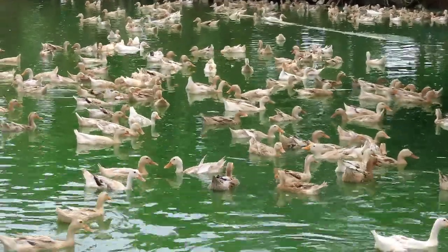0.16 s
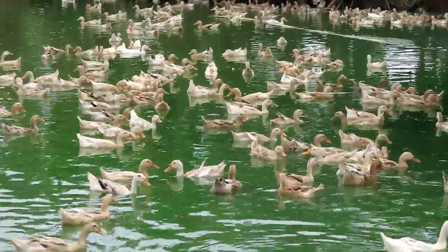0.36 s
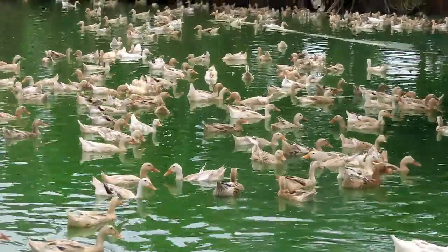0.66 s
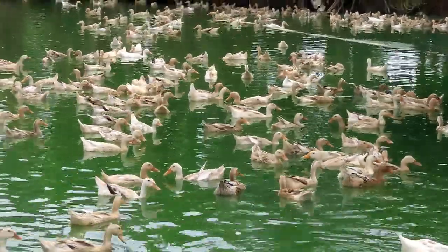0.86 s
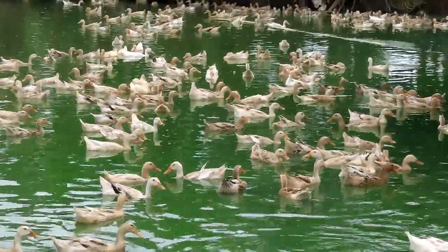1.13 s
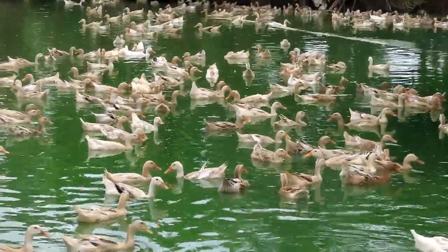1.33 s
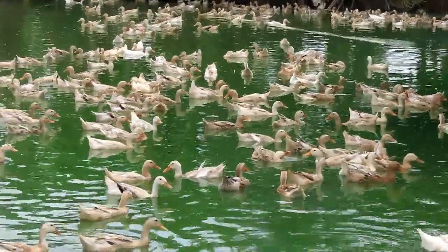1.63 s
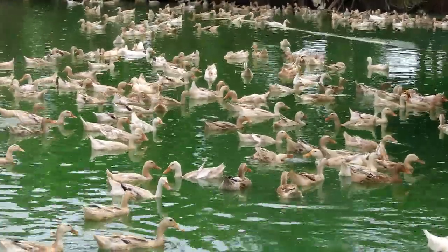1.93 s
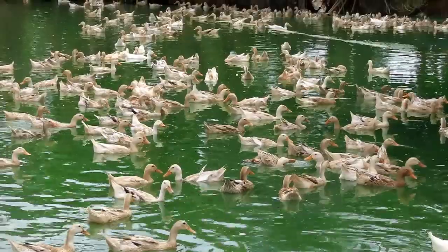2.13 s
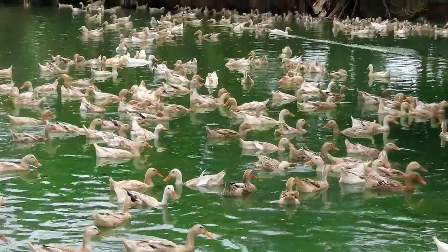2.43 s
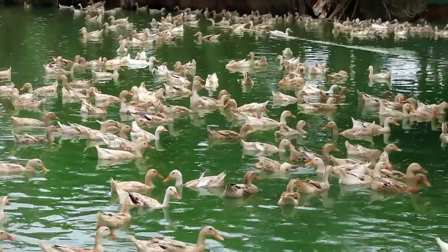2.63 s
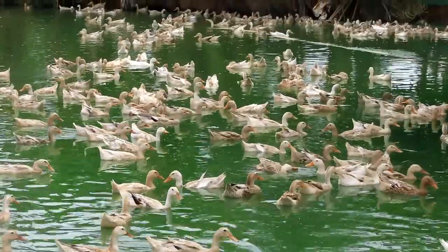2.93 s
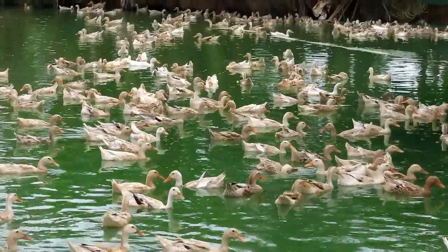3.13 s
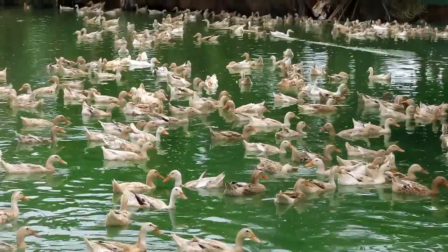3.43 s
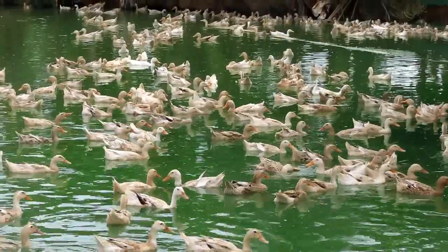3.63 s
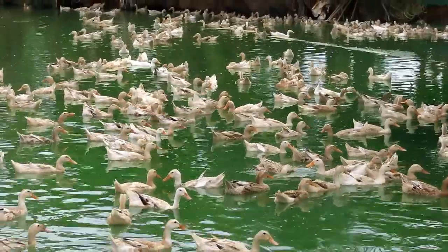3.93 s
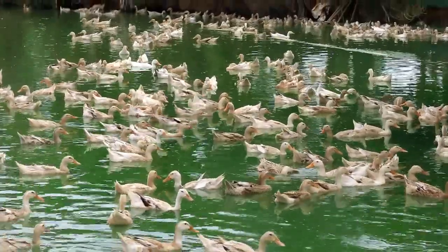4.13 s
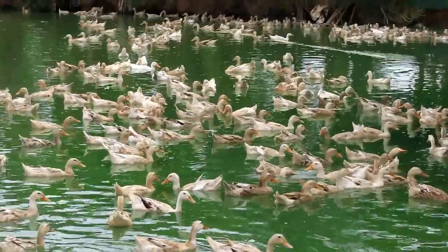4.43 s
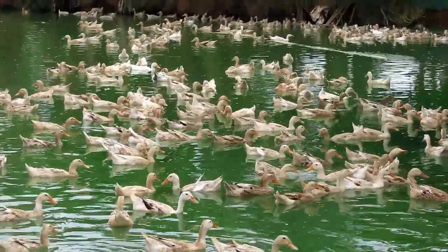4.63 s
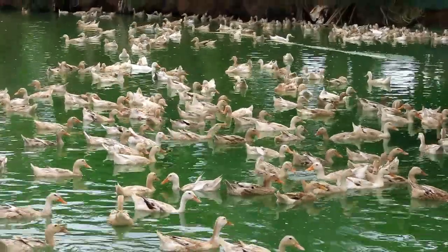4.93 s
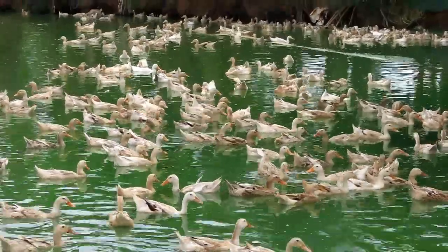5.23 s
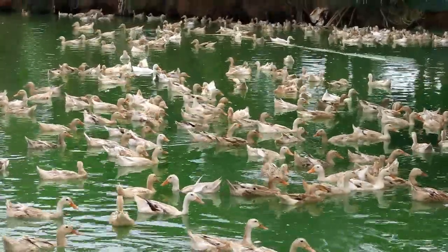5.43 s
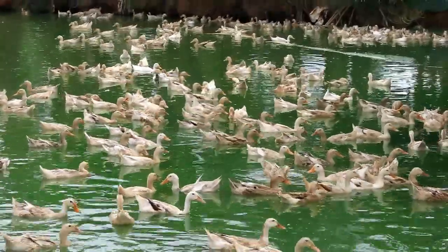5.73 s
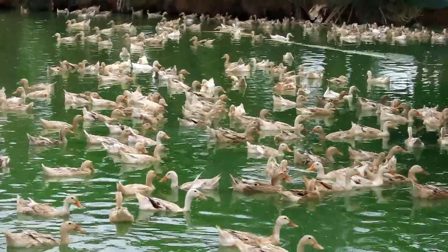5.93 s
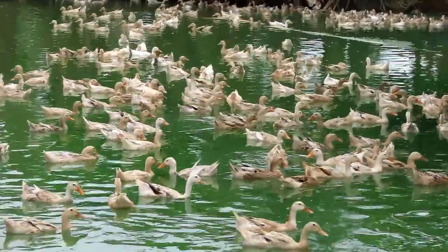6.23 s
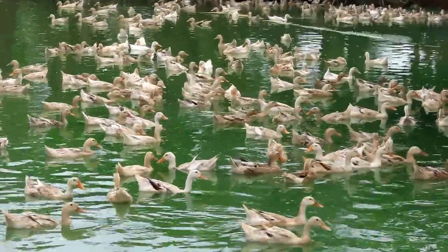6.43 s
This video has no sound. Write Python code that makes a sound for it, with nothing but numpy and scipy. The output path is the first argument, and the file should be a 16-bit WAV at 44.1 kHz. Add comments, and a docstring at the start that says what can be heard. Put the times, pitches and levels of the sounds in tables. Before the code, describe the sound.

One near duck rasps a steady run of quacks among grunting, chattering neighbours and a gabbling flock, as rumbling wind increasingly buffets the microphone.

```python
"""One duck repeats a loud rasping quack near the bank of a pond, among neighbours that grunt and chatter.
Each call is a train of throat snaps and air puffs ringing through resonances that move with the bill.
Behind them the far flock gabbles, many small calls at once, and paddles in a wash of filtered noise.
Water drops tick as short rings and a small bird twitters once in gliding sines. Growing gusts of wind,
made of filtered noise and single pulses, buffet the small stereo microphone."""
import sys
import numpy as np
from scipy import signal
from scipy.fft import rfft, irfft, next_fast_len
from scipy.io import wavfile
from scipy.ndimage import uniform_filter1d, map_coordinates

SR = 44100
rng = np.random.default_rng(int(sys.argv[2]) if len(sys.argv) > 2 else 0)


def bounce(signal):
    """Save signal as a 16-bit WAV file at the path given by the first command-line argument."""
    frames = np.transpose(np.atleast_2d(signal))
    limited = np.clip(frames, -1, 1)
    pcm = np.round(limited * 32767).astype(np.int16)
    wavfile.write(sys.argv[1], SR, pcm)


N = 289737
TIME = np.arange(N) / SR  # s

# throat resonances of each kind of call, the main one first: f/Hz, width/Hz, level/dB
QUACK_RESONANCES = [(1320, 190, 1.5), (800, 400, -19), (1720, 380, -12.5), (2250, 200, -3.5),
                    (2620, 260, -11), (2840, 200, -14), (3650, 450, -21), (4060, 260, -11),
                    (4550, 500, -23), (5100, 550, -25), (6000, 600, -31)]
GRUNT_RESONANCES = [(880, 330, 0), (280, 200, -8.5), (680, 160, -6), (1180, 330, -3), (1560, 260, -3),
                    (2180, 210, -7), (2750, 400, -14)]
CHATTER_RESONANCES = [(1350, 270, 3.5), (270, 160, -14), (850, 500, -13), (1830, 340, -2), (2900, 600, -15),
                      (4500, 1400, -23)]
# each kind of call by name: share of air noise (0-1), arch of the pitch (below 0 it drops at once and levels out)
CALL_KINDS = {"quack": (.11, .3), "grunt": (.08, -.5), "chatter": (.12, .3)}
THROAT_FOLLOWS = .22  # share of a call's pitch glide that the throat resonances make too


def amp(db):
    """Decibels to gain."""
    return 10 ** (np.asarray(db) / 20)


def unit(x):
    """Scales to rms 1."""
    return x / np.sqrt(np.mean(x ** 2) + 1e-20)


def read(points, hz):
    """Reads a spectrum on a log-frequency axis."""
    f, value = np.transpose(points)
    return np.interp(np.log(hz + 1), np.log(f + 1), value)


def follow(curve):
    """Reads a control curve at every sample."""
    return np.interp(TIME, *np.transpose(curve))


def colour(x, points):
    """Filters a whole track by a spectrum in dB."""
    size = next_fast_len(N + 4096)
    gain = amp(read(points, np.fft.rfftfreq(size, 1 / SR)))
    return irfft(rfft(x, size) * gain, size)[..., :N]


def drift(hz, size):
    """Random wander between new values drawn hz times a second; rms a little below 1."""
    knots = rng.standard_normal(4096)
    return np.interp(np.arange(size) * hz / SR, np.arange(len(knots)), knots)


def add(mix, s, sound):
    """Adds a sound to a track at time s."""
    start = round(s * SR)
    sound = sound[max(-start, 0):]
    part = mix[max(start, 0):][:len(sound)]
    part += sound[:len(part)]


def air_rumble():
    """Calm outdoor air: steady low noise, independent in mid and side."""
    # spectrum of the rumble: f/Hz, level/dB
    air_spectrum = [(30, -12), (70, 0), (130, -2), (300, -4), (430, -6), (600, -16), (1200, -50)]
    return amp(-51.5) * unit(colour(rng.standard_normal((2, N)), air_spectrum))


def wind_level():
    """Each gust rises quickly, holds and dies away on top of the breeze; in dB."""
    # breeze on the microphone, ahead of the last wind filter: t/s, level/dB
    breeze = [(0, -37), (.12, -56), (.33, -54), (.53, -30), (.74, -33.5), (.95, -45.5), (1.2, -41.5),
              (1.76, -34.5), (1.88, -44), (2.7, -59), (3.6, -34.5), (3.8, -49), (4.5, -40.5), (4.83, -33.5),
              (5.01, -36), (5.75, -39), (6.15, -33.5), (6.3, -35.5), (6.57, -38)]
    # gusts that ride on the breeze, ahead of the same filter: t/s, length/s, level/dB
    gust_rows = [(1.09, 0.098, -33), (1.238, 0.029, -29.5), (1.413, 0.079, -33), (1.567, 0.039, -33.5),
                 (1.819, 0.0063, -22), (2.16, 0.036, -35), (2.42, 0.022, -28.5), (2.534, 0.014, -34),
                 (2.757, 0.11, -38), (2.909, 0.067, -30), (3.0, 0.034, -38), (3.144, 0.015, -29.5),
                 (3.226, 0.031, -33), (3.293, 0.085, -34.5), (3.431, 0.017, -26), (3.485, 0.11, -34),
                 (3.57, 0.056, -22), (3.634, 0.019, -17.5), (3.663, 0.098, -23.5), (3.817, 0.02, -25.5),
                 (3.853, 0.075, -21), (3.951, 0.1, -23.5), (4.05, 0.069, -22.5), (4.108, 0.044, -31),
                 (4.225, 0.011, -24), (4.288, 0.02, -26.5), (4.309, 0.028, -22), (4.34, 0.046, -28),
                 (4.43, 0.018, -26), (4.549, 0.041, -29), (4.657, 0.026, -34), (4.693, 0.089, -26),
                 (4.909, 0.04, -27.5), (4.935, 0.049, -26.5), (5.02, 0.059, -32.5), (5.067, 0.059, -20),
                 (5.172, 0.046, -23), (5.224, 0.084, -25), (5.267, 0.074, -22), (5.366, 0.045, -30.5),
                 (5.403, 0.019, -21.5), (5.438, 0.072, -25.5), (5.517, 0.033, -25.5), (5.57, 0.049, -26),
                 (5.627, 0.039, -26), (5.727, 0.032, -27), (5.816, 0.04, -26.5), (5.887, 0.066, -26.5),
                 (5.969, 0.052, -24.5), (6.051, 0.057, -31.5), (6.136, 0.016, -37), (6.364, 0.037, -29.5),
                 (6.41, 0.1, -29.5)]
    rise_s, fall_s = 0.011, 0.018
    linger = 0.42  # a long gust takes this share of its length more to die away
    power = amp(follow(breeze)) ** 2
    for s, length, db in gust_rows:
        fall = fall_s + linger * length
        t = np.arange(0, length + fall, 1 / SR)
        rise = np.minimum(t / rise_s, 1)
        decay = np.clip(1 - (t - length) / fall, 0, 1) ** 2
        add(power, s, (amp(db) * rise * decay) ** 2)
    return 10 * np.log10(power)


def wind():
    """Lumpy turbulence at the microphone: the fresher the wind, the smaller and faster its eddies; mid and side."""
    # spectrum of the wind as heard: it stops steeply above about 500 Hz: f/Hz, level/dB
    eddy_spectrum = [(15, -47), (30, -26), (60, -6), (110, 5), (200, 3.5), (330, -2), (470, -11),
                     (500, -20), (540, -14), (900, -57.5)]
    # share of small, fast eddies, which grows as the wind freshens: t/s, share (0-1)
    freshness = [(0, 0.33), (3.35, 0.07), (3.65, 0.28), (3.85, 0.57), (4.3, 0.43), (4.85, 0.43),
                 (5.12, 0.72), (5.21, 1), (5.3, 0.52), (5.6, 0.55), (6.3, 0.45), (6.57, 0.68)]
    # single hard buffets, ahead of the last filter: t/s, peak/dB, f/Hz
    buffet_rows = [(0.507, -18.5, 105), (0.608, -15, 122), (0.657, -13, 147), (0.696, -16, 110),
                   (.707, -14, 110), (2.423, -24.5, 119), (3.614, -10, 116), (3.749, -19, 202),
                   (3.759, -12, 171), (3.765, -9.5, 330), (3.856, -8.5, 263), (3.897, -14, 250),
                   (3.934, -11, 260), (4.0585, -4.5, 232), (4.073, -10.5, 336), (4.094, -8, 236),
                   (4.331, -17, 159), (4.741, -9.5, 194), (5.119, -11, 330), (5.207, -28, 276),
                   (5.303, -12.5, 134), (5.735, -9.5, 290), (6.502, -14.5, 263)]
    lump_db, lumps_per_s = 3, 66  # turbulence makes the level stumble
    side_db = -28  # how much a fresh wind differs between the ears

    eddies = colour(rng.standard_normal((2, N)), eddy_spectrum)
    slow = unit(colour(eddies[0], [(70, 5.5), (120, -3.5), (200, -15.5), (400, -32.5)]))
    fast, across = unit(colour(eddies, [(35, -30), (70, -18), (120, 1.0), (190, 4.0), (300, 6)]))
    force = np.clip(follow(freshness), 0, 1)
    gusts = (1 - force) ** 1.41 * slow + force * fast
    running_rms = np.sqrt(uniform_filter1d(gusts ** 2, size=2600) + 1e-9)
    strength = amp(wind_level() + lump_db * drift(lumps_per_s, N)) / running_rms
    gusts = gusts * strength

    t = np.arange(-900, 900) / SR
    for s, db, hz in buffet_rows:
        # a passing eddy sucks once at the diaphragm, with a push on either side
        x = np.pi * hz * t
        add(gusts, s + t[0], amp(db) * (2 * x ** 2 - 1) * np.exp(-x ** 2) * np.hanning(len(t)))
    side = amp(side_db) * force * across * strength
    return colour(np.array([gusts, side]),
                  [(20, -12), (45, -5.0), (85, -1.0), (480, 1.0), (550, -16.0), (1000, -2)])


def paddling():
    """Countless small splashes blur into a patchy wash with a fine crackle on top; mid and side."""
    # spectrum of the wash and crackle: f/Hz, level/dB
    wash_spectrum = [(300, -6), (550, -5), (680, -3), (810, 0), (1020, -5.5), (1350, -5.5), (2000, -8.5),
                     (3200, -10.5), (4100, -13), (6300, -20), (10000, -29), (13000, -36), (15000, -50)]
    # the paddling grows a little; level of its treble above 4.5 kHz in the mid: t/s, level/dB
    splash_level = [(0, -60), (2.9, -57.5), (6.57, -55.5)]
    _, _, z = signal.stft(rng.standard_normal((2, N)), SR, nperseg=512)
    patches = uniform_filter1d(rng.standard_normal(z.shape[1:]), size=8, axis=0)
    patches = unit(uniform_filter1d(patches, size=9, axis=1))
    wash = unit(signal.istft(z * amp(2.3 * patches), SR, nperseg=512)[1][:, :N])

    falls = rng.random(N) < 250 / SR  # about 250 drops a second
    drop_gain = amp(4.5 * np.minimum(rng.exponential(1, N), 3.0))
    drops = falls * drop_gain * rng.standard_normal((2, N))
    spray = colour(wash + 0.33 * unit(drops), wash_spectrum)
    treble = colour(spray[0], [(4300, -64), (4600, 1.0)])
    return spray / np.std(treble) * amp(follow(splash_level))


def throat_ring(throat, main_hz, bright_db, body_db):
    """The short causal ring of a throat, whose resonances have steep skirts and dark valleys."""
    f = np.fft.rfftfreq(2048, 1 / SR)
    power = 1e-7
    for hz, width, db in throat:
        # opening the bill moves the main resonance most
        hz *= (main_hz / throat[0][0]) ** (min(hz / throat[0][0], throat[0][0] / hz) ** 3)
        power = power + amp(db) ** 2 / (1 + (2 * (f - hz) / width) ** 2) ** 2
    tilt_db = read([(850, body_db), (1300, 0), (1750, 0), (2200, bright_db)], f)
    # folding the cepstrum forward gives the minimum-phase ring
    cepstrum = irfft(np.log(np.sqrt(power) * amp(tilt_db)))
    cepstrum[1:len(f) - 1] *= 2
    cepstrum[len(f):] = 0
    return irfft(np.exp(rfft(cepstrum)))[:len(f)]


def bill_rings(throat, main_hz, bright_db, body_db):
    """The throat with the bill open, and lower and duller with it nearly shut."""
    shut = [(.97 * hz, width, db) for hz, width, db in throat]
    open_ring = throat_ring(throat, main_hz, bright_db + 1, body_db)
    shut_ring = throat_ring(shut, .96 * main_hz, bright_db - 4, body_db)
    return open_ring, shut_ring


def call(length, pitch, rings, rough, arch, crest, sag):
    """Snaps of the syrinx, each with a puff of air, ring a throat that glides as the bill opens and shuts."""
    jitter, throat_wobble = .014, .018  # random shift of the pitch and of the resonances (share)
    t = np.arange(int(length * SR) + 600) / SR
    u = np.minimum(t / length, 1)
    glide = -sag * (u - .5)
    pitch_glide = (1 - THROAT_FOLLOWS) * glide - arch * (u - .5) ** 2
    hz = pitch * (1 + pitch_glide + jitter * drift(200, len(t)))
    turns = np.cumsum(hz) / SR + rng.random()
    snaps = np.diff(np.floor(turns), prepend=0) * amp(1.1 * drift(220, len(t)))
    puffs = (.2 + np.exp(-(turns % 1) / .25)) * rng.standard_normal(SR)[:len(t)]

    swell = np.interp(u, [0, .1, crest, .85, 1], [0, .42, 1, .68, 0])
    drive = swell * (np.sqrt(1 - rough) * unit(snaps) + np.sqrt(rough) * unit(puffs))
    bill = swell * np.sqrt(swell)  # wide open at the crest of the call
    voice = signal.fftconvolve(drive * bill, rings[0]) + signal.fftconvolve(drive * (1 - bill), rings[1])
    # reading the voice at a varying speed shifts its resonances
    speed = 1 + THROAT_FOLLOWS * glide + throat_wobble * drift(70.6, len(t))
    return unit(map_coordinates(voice, [np.cumsum(speed)], order=3))


def duck(rows, throat, rough, arch, crest):
    """A run of calls from one kind of throat."""
    out = np.zeros(N)
    for s, length, pitch, db, main_hz, bright_db, body_db, sag in rows:
        rings = bill_rings(throat, main_hz, bright_db, body_db)
        # each call begins 2 ms early and ends 2 ms late
        add(out, s - .002, amp(db) * call(length + .004, pitch, rings, rough, arch, crest, sag))
    return out


def far_flock(count=175):
    """Many distant ducks, each with its own pitch, throat size and bearing; mid and side."""
    # running level of the gabble in the mid: t/s, level/dB
    gabble_level = [(0, -49.5), (1.5, -50.5), (2.6, -53), (3.8, -49), (4.5, -53), (5.2, -48), (5.9, -52),
                    (6.57, -51)]
    out = np.zeros((2, N))
    for k, (when, size, pitch, length, near, bearing, bend) in enumerate(rng.random((count, 7))):
        throat = [CHATTER_RESONANCES, GRUNT_RESONANCES, QUACK_RESONANCES][k % 3]
        throat = [(hz * (.82 + .2 * size), width, db) for hz, width, db in throat]
        rings = bill_rings(throat, throat[0][0], bright_db=-2, body_db=4)
        voice = call(.04 + .03 * length, 160 + 60 * pitch, rings, rough=.18, arch=.3, crest=.5, sag=.4 * bend)
        voice = amp(5.5 * near) * voice
        s = (k + 1.5 * when - 1) / count * N / SR
        add(out[0], s, voice)
        add(out[1], s, voice * 3 * (bearing - .5))
    running_rms = np.sqrt(uniform_filter1d(out[0] ** 2, size=SR // 2) + 1e-9)
    return out / running_rms * amp(follow(gabble_level))


def banks(x):
    """Scattered echoes off banks and trees, the decay depending on frequency; mid and side."""
    # echo of the banks: f/Hz, t60/s
    bank_decay = [(300, 0.11), (1500, 0.11), (4000, 0.066), (10000, 0.081)]
    hits = rng.standard_normal((2, SR // 2))
    taps = hits * (rng.random((2, SR // 2)) < 2500 / SR)  # about 2500 echoes a second
    hz, t, z = signal.stft(taps, SR, nperseg=256)
    decay = amp(-60 * t / read(bank_decay, hz)[:, None])
    build_up = np.minimum(t / 0.0047, 1)
    tail = signal.istft(z * decay * build_up, SR, nperseg=256)[1]
    return signal.fftconvolve(x[None], tail / np.linalg.norm(tail[0]), axes=1)[:, :N]


def bird():
    """A thin, hoarse voice with a trace of its octave: a few arched chips run into one falling whistle."""
    # quick arched chips: t/s, length/s, top f/Hz, level/dB
    chip_rows = [(2.224, 0.015, 3560, -45), (2.237, 0.033, 4540, -44.5), (2.254, 0.015, 3640, -43),
                 (2.257, 0.016, 5400, -45), (2.272, 0.0216, 4040, -39.5), (2.285, 0.0166, 4900, -46),
                 (2.292, 0.0247, 4240, -41.5)]
    chip_arch = 0.252  # share by which a chip starts and ends below its top
    chip_octave, whistle_octave = 0.18, 0.05  # height of the octave against the note
    hoarse = 0.046  # random wobble of the pitch (share)
    # one long whistle slides onto its note, quavers, and drops away
    whistle_s, whistle_length_s, whistle_hz, whistle_db = 2.312, .102, 4150, -43
    slide_hz, slide_s, quaver_hz, quaver_per_s = 1110, 0.033, 110, 69
    drop_s, drop_hz_per_s = 0.016, 83000

    notes = []
    for s, length, top_hz, db in chip_rows:
        u = np.linspace(-1, 1, int(length * SR))
        notes.append((s, top_hz * (1 - chip_arch * u ** 2), db, chip_octave))
    t = np.arange(0, whistle_length_s, 1 / SR)
    slide = slide_hz * np.exp(-(t / slide_s) ** 2)
    quaver = quaver_hz * np.sin(2 * np.pi * quaver_per_s * t)
    drop = drop_hz_per_s * np.maximum(t - whistle_length_s + drop_s, 0)
    notes.append((whistle_s, whistle_hz + slide + quaver - drop, whistle_db, whistle_octave))

    out = np.zeros(N)
    for s, hz, db, octave in notes:
        phase = 2 * np.pi * np.cumsum(hz * (1 + hoarse * drift(1150, len(hz)))) / SR
        tone = (np.sin(phase) + octave * np.sin(2 * phase)) * signal.windows.tukey(len(hz), .3)
        add(out, s, amp(db + 1.5 * drift(590, len(hz))) * tone)
    return out


def ticks():
    """Water drops and bill snaps: a sharp crack and a few milliseconds of ring."""
    # drops and snaps, ahead of the filter and a common 4 dB lift: t/s, peak/dB, ring f/Hz
    tick_rows = [(0.2942, -29.5, 5060), (0.4547, -36.5, 4180), (1.3604, -38, 5140), (1.866, -43, 2830),
                 (2.505, -34.5, 4050), (2.6382, -28, 2980), (2.786, -37.5, 4150), (4.788, -39, 7200),
                 (4.8576, -35.5, 6540), (5.0544, -35, 9000), (6.362, -39, 5800)]
    # partials of the ring: multiple of its f, level/dB, t60/s
    ring_partials = [(1, -6.5, 0.02), (.66, -4, 0.01), (1.45, -20, 0.002)]
    out, t = np.zeros(N), np.arange(1500) / SR
    for s, db, hz in tick_rows:
        crack = rng.standard_normal(len(t)) * np.exp(-(t / .003) ** 2)
        ring = sum(amp(level - 60 * t / t60) * np.sin(2 * np.pi * hz * k * t)
                   for k, level, t60 in ring_partials)
        tick = (ring + .6 * crack) * np.minimum(t / .0012, 1)
        add(out, s, amp(db + 4) * tick / abs(tick).max())
    return colour(out, [(1200, -44), (3000, 8.0), (8000, 1), (15000, -16.0)])


def hoots():
    """Before it breaks into snaps the voice briefly sings, unsteadily, on a low throat resonance."""
    # almost pure hoots that lead into some calls: t/s, length/s, f/Hz, level/dB
    hoot_rows = [(0.238, 0.018, 917, -33.5), (0.51, 0.019, 857, -31), (1.171, 0.016, 842, -38),
                 (1.463, 0.019, 886, -36), (2.005, 0.015, 883, -34.5), (2.541, 0.013, 1015, -35.5),
                 (3.224, 0.045, 837, -34), (3.564, 0.016, 848, -31)]
    out = np.zeros(N)
    for s, length, hz, db in hoot_rows:
        u = np.linspace(0, 1, int(length * SR))
        wander = 1 - 0.036 * (u - .5) + 0.035 * drift(267, len(u))
        phase = 2 * np.pi * np.cumsum(hz * wander) / SR
        swell = np.sqrt(2 * abs(np.sin(np.pi * u))) * amp(db + drift(530, len(u)))
        add(out, s, swell * (np.sin(phase) + 0.11 * np.sin(2 * phase)))
    return out


def chattering():
    """Neighbours chatter: calls from a throat with broad resonances."""
    # t/s, length/s, pitch f/Hz, level/dB, main resonance f/Hz, brightness/dB, body/dB, pitch fall (share)
    chatter_rows = [(0.11, 0.05, 172, -37.5, 1310, -7, 2, 0.35), (0.187, 0.04, 160, -42, 1500, -9, 3, .5),
                    (0.323, 0.043, 178, -40.5, 1520, -7, 0, 0.58),
                    (0.452, 0.042, 172, -41, 1520, -9, 2, 0.097),
                    (1.235, 0.065, 177, -48.5, 1370, -11, -2, 0.14),
                    (1.553, 0.054, 188, -43, 1440, -9, 7, 0.17),
                    (2.543, 0.034, 199, -40.5, 1500, 1, 3, 0.23),
                    (3.23, 0.046, 158, -34, 1490, -4.5, 6, 0.14),
                    (3.433, 0.028, 178, -47.5, 1440, -3, 6, 0.12),
                    (3.83, 0.039, 194, -47.5, 1680, 5, -8, .1), (4.8, 0.041, 189, -50, 1600, -7, -2, 0.18),
                    (5.025, 0.038, 183, -43.5, 1400, -5, 19, 0.22),
                    (5.095, 0.038, 191, -46.5, 1220, -11, 8, 0.14),
                    (5.355, 0.061, 211, -35, 1330, -5, -6, 0.27),
                    (5.655, 0.055, 192, -35.5, 1410, 1, 0.5, .15),
                    (5.89, 0.049, 192, -45.5, 1400, 0, 1, 0.21),
                    (5.95, 0.048, 200, -42.5, 1410, 1, 5, 0.22),
                    (6.09, 0.043, 184, -39, 1300, -2, -7, 0.23),
                    (6.225, 0.055, 180, -47, 1370, -10, -7, 0.22),
                    (6.37, 0.058, 172, -45.5, 1310, -12, 8, 0.21),
                    (6.43, 0.071, 203, -44, 1410, -5, -4, 0.18)]
    return duck(chatter_rows, CHATTER_RESONANCES, *CALL_KINDS["chatter"], crest=0.47)


def grunting():
    """Neighbours grunt: a low main resonance, and a pitch that drops at once and levels out."""
    # t/s, length/s, pitch f/Hz, level/dB, main resonance f/Hz, brightness/dB, body/dB, pitch fall (share)
    grunt_rows = [(-0.012, 0.059, 187.6, -36, 914, -13, 0.5, .45),
                  (0.25, 0.051, 192.7, -36, 900, -9, 1.5, 0.54),
                  (0.53, 0.043, 183.6, -36.5, 950, 2, 2, 0.41),
                  (1.182, 0.051, 183.8, -36, 930, -14, 0.5, 0.46),
                  (1.474, 0.044, 190.8, -34.5, 890, -12, -2.5, 0.5),
                  (1.738, 0.045, 183.2, -35.5, 900, -5.5, -0.5, 0.58),
                  (2.022, 0.044, 192.3, -36, 910, -6, -1.5, 0.416),
                  (3.578, 0.04, 177.2, -38, 880, -14, -2, 0.64),
                  (6.385, 0.091, 203.8, -42, 860, -13, -5, 0.34)]
    return duck(grunt_rows, GRUNT_RESONANCES, *CALL_KINDS["grunt"], crest=0.4)


def quacking():
    """The near duck's rasping quack: a narrow main resonance and many above it."""
    # t/s, length/s, pitch f/Hz, level/dB, main resonance f/Hz, brightness/dB, body/dB, pitch fall (share)
    quack_rows = [(0.834, 0.053, 202, -35.5, 1320, -3.5, 0, -.06),
                  (1.118, 0.062, 188.6, -35.5, 1314, -2.5, 5, 0.096),
                  (1.405, 0.059, 196, -36, 1335, -1.5, 7, .1),
                  (1.692, 0.068, 205.2, -36, 1354, -3, 11.5, 0.17),
                  (1.995, 0.045, 203.4, -37.5, 1330, -2.5, 9, 0.13),
                  (2.298, 0.049, 192.6, -37, 1316, 1, 2, 0.192),
                  (2.612, 0.061, 198, -37.5, 1330, -1.5, 6, 0.24),
                  (2.94, 0.056, 186.1, -39, 1320, -3.5, 7, -0.12),
                  (3.303, 0.047, 186.6, -37.5, 1304, -4, 0, .05),
                  (3.525, 0.037, 187, -43, 1930, -6, 9, 0.21),
                  (5.44, 0.052, 200, -38.5, 1330, -3.5, -3, .2),
                  (5.710, 0.056, 191.9, -32, 1340, -2.5, -5, -.2),
                  (5.977, 0.064, 202, -35, 1323, -1, -1, 0.072)]
    return duck(quack_rows, QUACK_RESONANCES, *CALL_KINDS["quack"], crest=0.43)


def scene():
    """Near ducks, far flock and water in mid and side; the wind is almost alike in both ears."""
    # filter of the side signal: f/Hz, level/dB
    side_spectrum = [(100, -59), (500, -20.5), (1000, -28.5), (2000, -12.5), (4000, -9.5), (8000, -1.5),
                     (12000, 7)]
    near = quacking() + grunting() + chattering() + hoots() + bird()
    flock = far_flock()
    direct = (near + ticks()) * np.array([[1], [.7]])
    echoes = amp(-4.5) * banks(near) + amp(-3.0) * banks(flock[0])
    mid, side = direct + echoes + flock + paddling() + air_rumble()
    side = colour(side, side_spectrum)  # closely spaced capsules differ only in the treble
    side = signal.hilbert(side, next_fast_len(N))[:N].imag  # and in timing rather than level
    mid, side = np.array([mid, side]) + wind()
    return np.array([mid + side, mid - side])


def record(dry):
    """The recorder's band limit: a steep low-pass."""
    edge_hz = 15450
    low_pass = signal.firwin(511, edge_hz, window=("kaiser", 9), fs=SR)
    return signal.oaconvolve(dry, low_pass[None], "same")


dry = scene()
out = record(dry)
bounce(out)
```